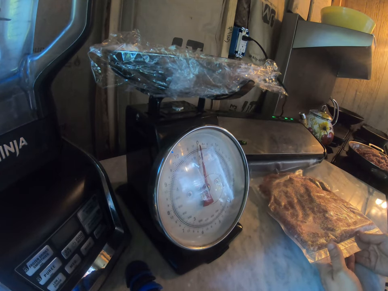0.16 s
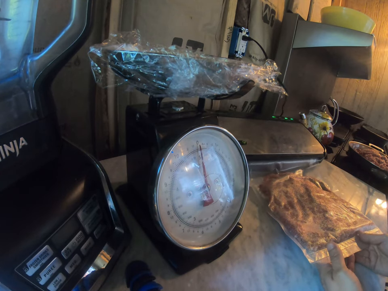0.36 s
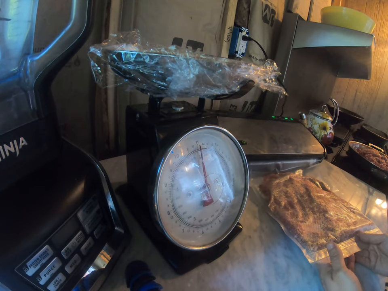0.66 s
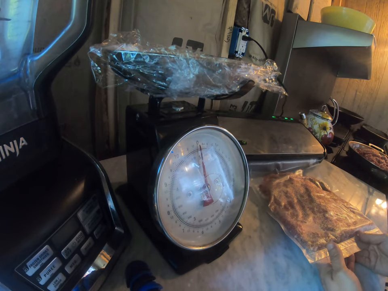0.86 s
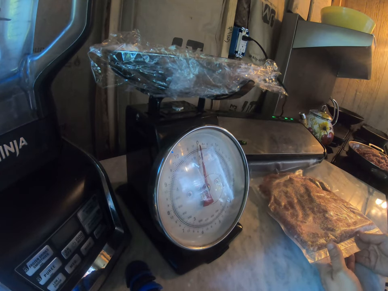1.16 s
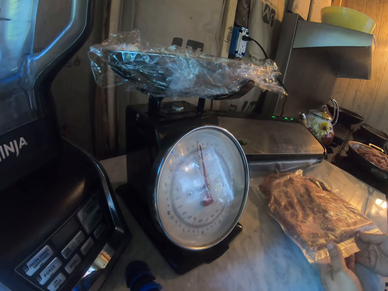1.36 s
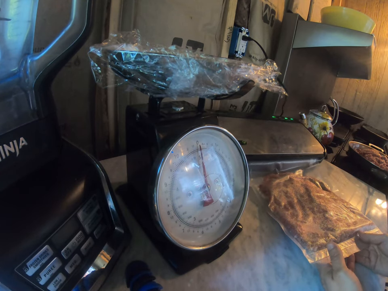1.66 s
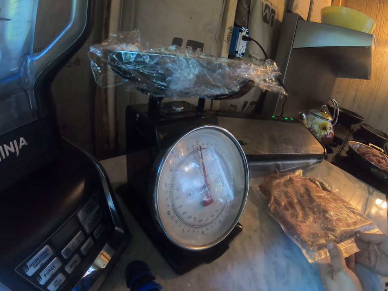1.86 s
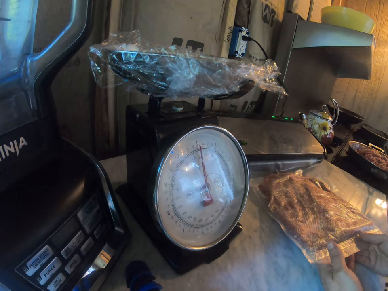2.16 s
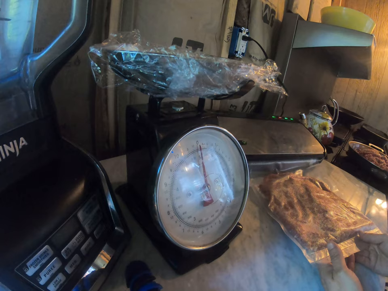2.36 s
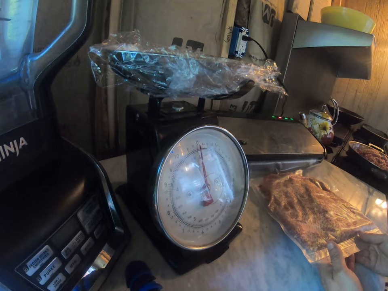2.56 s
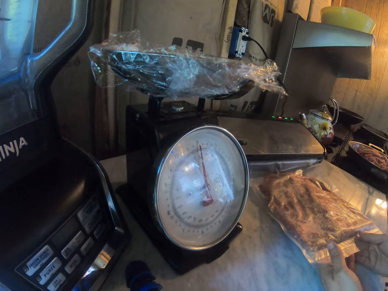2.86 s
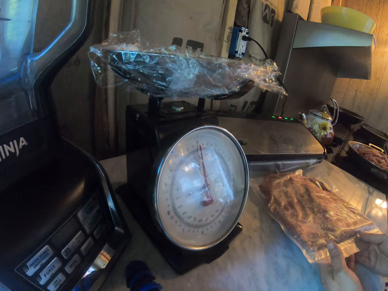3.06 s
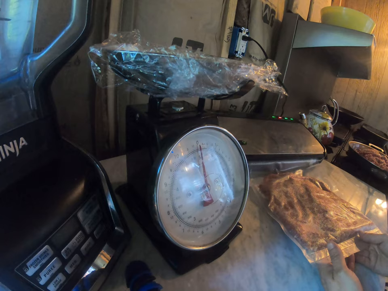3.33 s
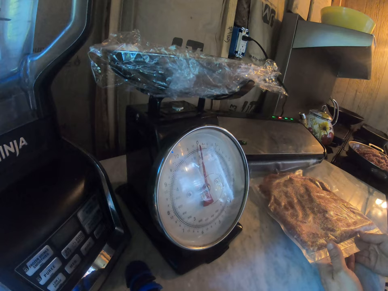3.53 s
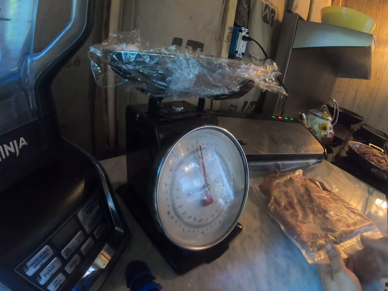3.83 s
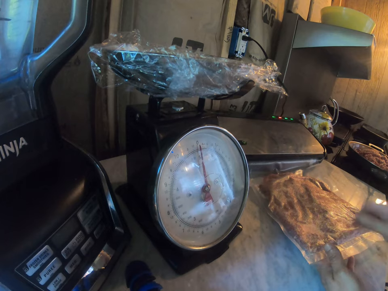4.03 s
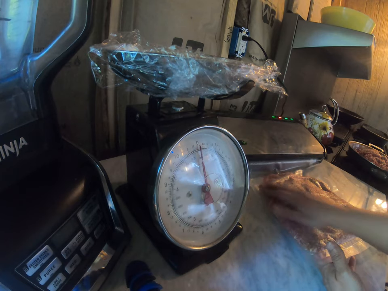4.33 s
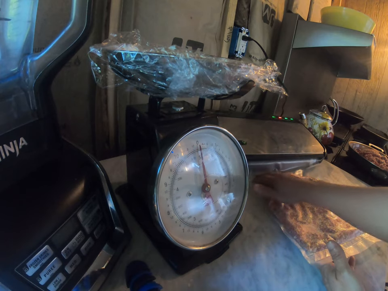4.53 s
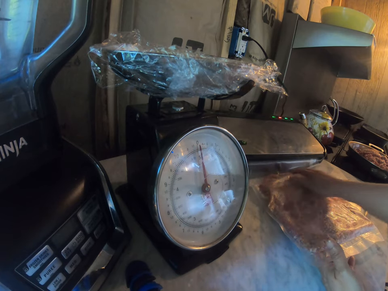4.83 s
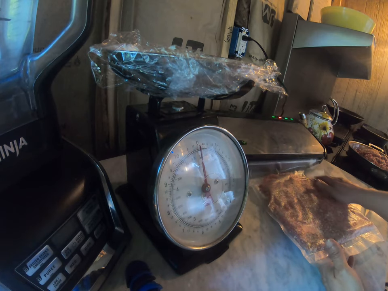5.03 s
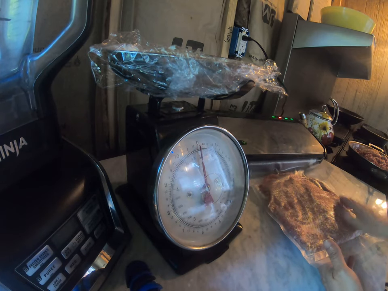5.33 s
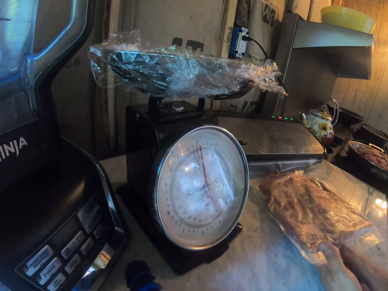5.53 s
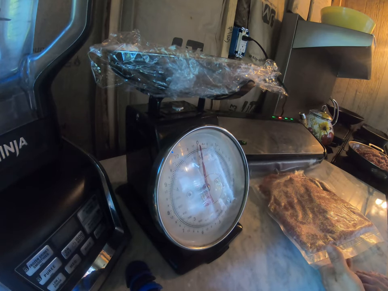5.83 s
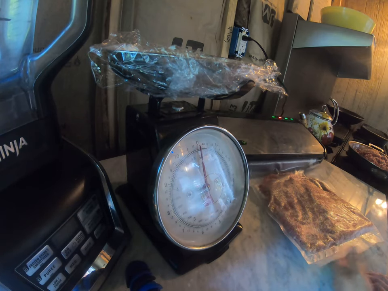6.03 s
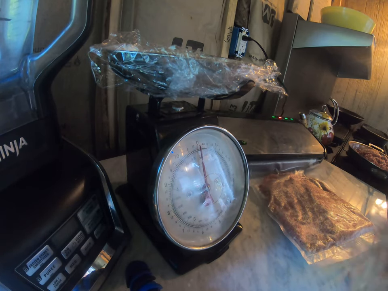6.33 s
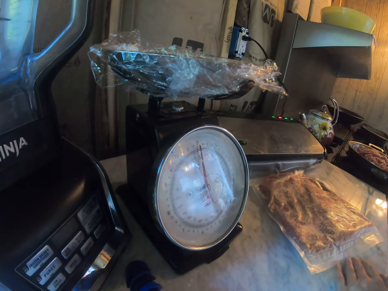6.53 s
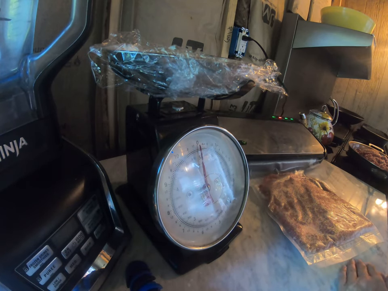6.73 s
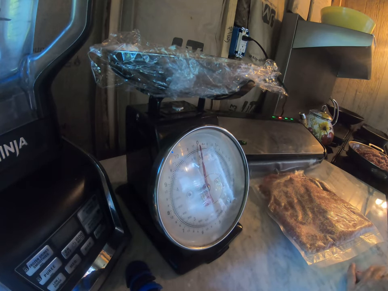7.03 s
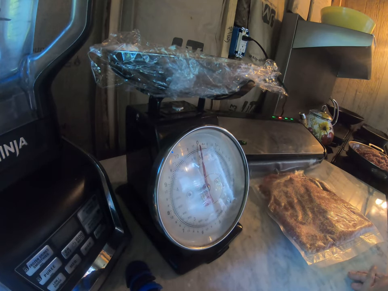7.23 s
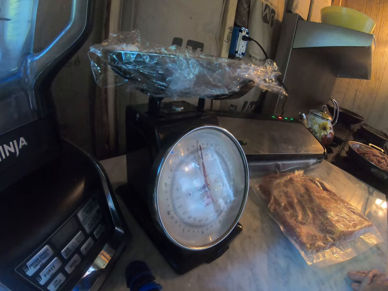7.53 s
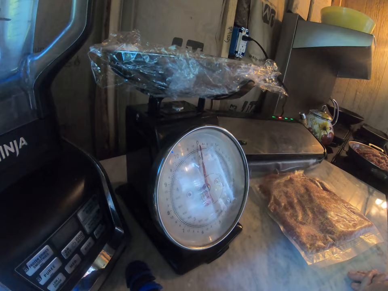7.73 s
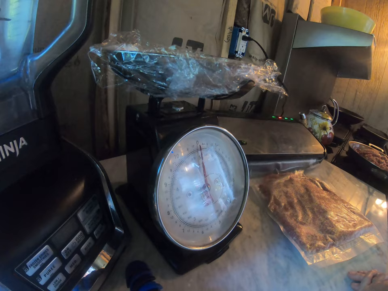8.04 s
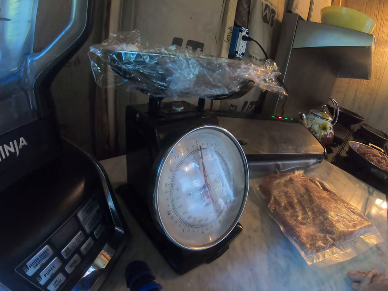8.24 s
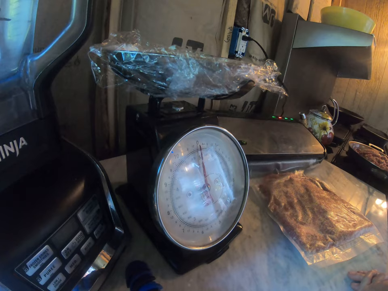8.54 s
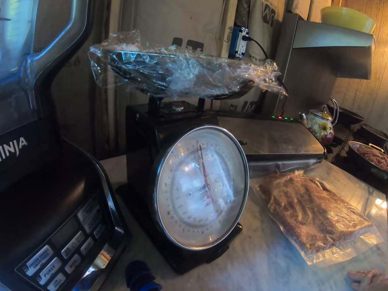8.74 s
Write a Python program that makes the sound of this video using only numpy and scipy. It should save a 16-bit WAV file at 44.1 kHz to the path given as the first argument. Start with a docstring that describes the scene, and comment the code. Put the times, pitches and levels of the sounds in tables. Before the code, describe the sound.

A vacuum sealer pump drones and buzzes, stops with a valve tick, then a plastic bag crinkles and taps the counter over a throbbing low hum.

```python
"""In a small kitchen, a vacuum sealer pumps air from a bag, stops at about 2.4 s, and its valve ticks.
The pump is a droning set of partials with noise for the air, the slapping flaps and a loose part.
A hand then shifts a plastic bag of meat and taps it on the counter: filtered noise, tiny snaps, short ringing tones.
Throughout, a throbbing low hum comes through the walls, probably from engines running outside:
beating tones over filtered rumble and hiss, louder towards the end."""
import sys
import numpy as np
from scipy import signal
from scipy.fft import rfft, irfft, next_fast_len
from scipy.io import wavfile
from scipy.ndimage import uniform_filter1d

SR = 44100
rng = np.random.default_rng(int(sys.argv[2]) if len(sys.argv) > 2 else 0)


def pcm_store(signal):
    """Save signal as 16-bit PCM."""
    levels = np.round(np.clip(np.atleast_2d(signal), -1, 1) * 32767)
    wavfile.write(sys.argv[1], SR, levels.astype(np.int16).T)


N = 392049
T = np.arange(N) / SR  # time in seconds

# A t60 is the time in seconds in which a sound fades by 60 dB.
# Levels in the tables are starting points; the functions trim and vary them.
# The motor runs until STOP_S; the air flow from the bag dwindles with the time constant EMPTYING_S.
STOP_S, EMPTYING_S = 2.422, 1
# After the stop the drone rings out and the air hisses on a moment longer.
DRONE_T60_S, AIR_T60_S, AIR_LINGERS_S = 0.32, 0.17, 0.024
VALVE_S = 2.641  # when the valve ticks
# Average pump speed. Each row: time in seconds, strokes per second.
PUMP_SPEED = [(0, 72.15), (.5, 72.45), (1.33, 72.9), (2.4, 73.5), (2.47, 76)]
# Strong partials of the pump drone. Each row: multiple of the stroke rate, level in dB, left minus right in dB.
DRONE_PARTIALS = [(1, -20, -2.5), (2, -26.5, 1), (3, -38.5, 0), (4, -36, -0.5), (5, -39, 0), (6, -39.5, 0),
                  (7, -35.5, 1.5), (8, -39, 6), (9, -44, 3), (10, -37.5, 0), (11, -40, 3), (12, -52, 6),
                  (13, -58, -2), (14, -52.5, -20), (15, -47, -8), (16, -48, -3), (17, -47.5, -12),
                  (18, -38.5, -4.5), (19, -46, 8), (20, -46.5, -6), (22, -49.5, -4.5), (23, -50, -3),
                  (24, -54, 16), (25, -53.0, 4), (26, -52, -16), (27, -57, 1), (31, -54, -3), (34, -54, -3),
                  (35, -58, -4), (37, -55, 0), (38, -57, -3), (41, -58, -2)]
# Faint valve buzz above the drone. Each row: frequency in Hz, level in dB.
VALVE_BUZZ = [(1500, -63), (2000, -54.5), (2150, -65), (2350, -56), (2550, -68), (2900, -59.5),
              (3150, -61.5), (3500, -65), (4400, -70)]
# How far the casing scatters the partials out of step. Each row: frequency in Hz, typical phase in radians.
PHASE_SMEAR = [(400, 2), (900, .6), (1600, .65), (3000, 1.1)]
# How far the left ear leads the right. Each row: frequency in Hz, lead in radians.
LEFT_EAR_LEAD = [(300, -0.57), (600, -0.39), (950, -1.9), (1290, 0.91), (1640, 1.7), (1980, -1.5),
                 (2330, 0), (2840, 0.14)]
# Outlet resonances and a dip, strongest while air flows. Each row: frequency in Hz, width in Hz, dB at full flow.
OUTLET_BUMPS = [(413, 82, 8.5), (864, 65, 17), (1222, 70, 20), (1554, 51, 17.5), (1940, 98, 11),
                (2500, 86, -12), (2930, 210, 10.5)]
# Casing resonances and notches, which deepen as the diaphragm strains against the vacuum.
# Each row: frequency in Hz, width in Hz, dB at full vacuum.
CASING_BUMPS = [(700, 47, 4.5), (795, 46, -9), (980, 43, 12), (1179, 43, 14), (1305, 31, -16),
                (2690, 70, 6)]
# Pump chamber resonances, which sink as the pressure falls.
# Each row: frequency in Hz at the start, frequency in Hz at the stop, width in Hz, lift in dB.
CHAMBER_BUMPS = [(1058, 930, 93, 9), (2446, 2330, 45, 12.5)]
# Air forced through the valves. Each row: frequency in Hz, level in dB per Hz.
AIR_SPECTRUM = [(100, -69), (250, -81), (500, -67.5), (950, -76), (1250, -68), (1550, -74.5), (1850, -75),
                (2400, -78.5), (2950, -76.5), (3400, -79.5), (4400, -87), (5000, -89), (7400, -87.5),
                (8200, -94), (10000, -100), (14000, -119)]
# Resonance of the valve flaps. Each row: frequency in Hz, level in dB per Hz.
FLAP_SPECTRUM = [(300, -82), (900, -67), (1250, -55.5), (1600, -72), (3000, -76.5), (5000, -91),
                 (12000, -130)]
# The last strokes clack as the motor stalls. Each row: time in seconds, level in dB.
LAST_CLACKS = [(2.412, 2), (2.425, 3), (2.45, 5), (2.479, -2), (2.52, -20)]
# A loose part of the casing chatters. Each row: frequency in Hz, level in dB per Hz.
CHATTER_SPECTRUM = [(1200, -120), (1700, -81.5), (1770, -66), (1860, -71), (1950, -80), (2800, -120)]
# The chatter sets in around CHATTER_S and flutters. Each row: flutters per second, depth in dB.
CHATTER_S = 0.7
FLUTTERS = [(6.5, 2.6), (20.3, 3.5)]
# The valve's tick. Each row: frequency in Hz, level in dB per Hz.
TICK_SPECTRUM = [(600, -96), (1400, -62), (2200, -69), (3300, -67.5), (5500, -82), (8000, -71),
                 (10000, -87), (14000, -102)]
# Moves of the hand on the bag; each fades out by one and a half lengths.
# Each row: start in seconds, length in seconds, level in dB, crackle over rubbing in dB.
HAND_MOVES = [(3.754, .12, -2.5, -3), (3.867, 0.018, 0.5, 0.5), (4.064, 0.24, -6, -1),
              (4.678, 0.17, -0.5, 1.5), (4.808, .17, 2, -10), (5.048, 0.055, -1.5, 1.5),
              (5.2, 0.097, -1, -7), (5.42, 0.047, -4.5, 7), (5.465, 0.14, -3, 1), (6.026, 0.075, -1, -3),
              (6.11, .045, -2, -6), (6.415, 0.021, -10, 10.5), (6.473, 0.15, -2.5, -7)]
# Crackle of the plastic film. Each row: frequency in Hz, level in dB per Hz.
FILM_SPECTRUM = [(500, -110), (1300, -85), (3100, -90.5), (4300, -94.5), (6000, -91.5), (8500, -95),
                 (11000, -107), (15000, -128)]
# The film rubbing on the counter. Each row: frequency in Hz, level in dB per Hz.
RUB_SPECTRUM = [(600, -110), (1300, -77), (2200, -84), (3100, -83.5), (3800, -91), (7000, -110),
                (14000, -140)]
# Sliding film. Each row: start in seconds, length in seconds, peak level in dB per Hz, peak frequency in Hz.
FILM_SLIDES = [(4.834, 0.068, -70.5, 2750), (5.06, .045, -79, 2800), (5.22, .09, -82, 2700),
               (5.419, .15, -79, 3150), (6.475, .025, -75, 3250), (6.562, 0.037, -75, 3300)]
# Taps of the bag on the counter. Each row: start in seconds, level in dB, brightness in dB, pitch ratio.
BAG_TAPS = [(3.878, -34, 9, 0.98), (4.788, -27.5, 5, 1.25), (4.864, -21.5, -8, 0.9),
            (4.8894, -18.5, 2, 1.14), (4.9285, -7.8, 2.2, 1.035), (4.9402, -28, 18, 1.1),
            (5.611, -22.5, -9, 0.92), (6.139, -12, -21, 0.91), (6.483, -24.5, 0, 1.2),
            (6.489, -24, -6, 0.99), (6.571, -26, -1, 0.7), (6.588, -21.5, 2.5, 1.05), (6.6, -27, -5, 0.91),
            (6.657, -21.5, -3, 0.8)]
# What the taps ring with. Each row: frequency in Hz, t60 in seconds, level in dB.
TAP_RINGS = [(1420, 0.013, -1.5), (1700, 0.0075, 5), (2370, 0.0069, 0), (2750, 0.008, -6.5),
             (3700, .006, -16), (5440, 0.011, -15.5), (7160, 0.007, -14.5), (8700, 0.0057, -20)]
# Each tap jolts the film: crackle in dB for a tap of 0 dB, dB per dB of tap, t60 in seconds.
JOLT_DB, JOLT_SLOPE, JOLT_T60_S = 14, 0.95, 0.13
# Average speed of the first engine. Each row: time in seconds, cycles per second.
ENGINE_SPEED = [(0, 25.17), (2.5, 25.07), (3.3, 25.65), (4.1, 25.73), (4.7, 25.18), (5.3, 25.6),
                (7.2, 24.96), (8, 25.4), (8.9, 24.95)]
# Its partials. Each row: multiple of the cycle rate, level in dB.
ENGINE_PARTIALS = [(1, -44), (2, -32.5), (3, -29.5), (4, -40.5), (6, -33.5), (7, -34), (8, -34.5),
                   (10, -44), (12, -44.5), (13, -45), (26, -63.5)]
# Its booming partial. Each row: time in seconds, level in dB, depth of the throb from 0 to 1.
BOOM_LEVEL = [(0.74, -26, 0.08), (0.97, -20, 0.5), (1.94, -27, 0.93), (1.96, -20, 0.76), (2.68, -26, 0.15),
              (3.23, -25.5, 0.34), (3.8, -25.5, 0.15), (4.25, -19.0, 0.18), (4.61, -20, 0.77),
              (5.12, -24.5, 0.6), (5.51, -22, 0.33), (5.88, -28.5, 0.5), (6.21, -23.5, 0.9),
              (6.83, -21, 0.5), (7.22, -22.5, 0), (7.65, -21, 0.38), (8.04, -16.5, 0.65), (8.78, -18, 0.34)]
# The boom throbs evenly between these crests, about three times a second.
# Each row: time in seconds, throbs so far.
BOOM_THROBS = [(-.21, 0), (1.47, 5), (2.05, 7), (2.41, 8), (2.97, 10), (3.44, 11), (4.23, 14), (5.1, 17),
               (5.53, 18), (7.47, 24), (8.66, 28), (8.83, 29), (9.1, 30)]
# The engine's two lowest partials swell and ebb: crest in seconds, width in seconds, lift in dB.
LOW_SWELL = (7.4, 2, 9.8)
# A second, wavering hum that draws near.
# Each row: time in seconds, base pitch in Hz, level in dB, depth of the pulsing from 0 to 1.
SECOND_HUM = [(0, 61.2, -44.5, 0.1), (3, 61.83, -43.5, 0.03), (5.2, 62.03, -40, 0),
              (6.1, 61.77, -30.5, .05), (6.9, 60.4, -28, 0.75), (7.5, 60.64, -30, 0.44),
              (8, 61.72, -26.5, 0.68), (8.4, 61.33, -28, 0.57), (8.9, 61.07, -24.5, 0.46)]
# Its partials. Each row: multiple of the base pitch, level in dB.
SECOND_HUM_PARTIALS = [(4, -1), (5, -17.5), (6, -16), (8, -23), (10, -29), (11, -34.5)]
# The second hum pulses about six times a second. Each row: time in seconds, pulses so far.
SECOND_HUM_PULSES = [(0, 0), (6.9, 40), (7.37, 43), (7.65, 44), (7.89, 45), (8.04, 46), (8.42, 48),
                     (8.95, 51)]
# Its fifth and sixth partials each flare up once: crest in seconds, width in seconds, lift in dB.
FIFTH_FLARE, SIXTH_FLARE = (7.9, 0.38, 11), (6.32, 0.4, 8)
# Rumble of the running machinery. Each row: frequency in Hz, level in dB per Hz.
RUMBLE_SPECTRUM = [(20, -75.5), (34, -54.5), (44, -59.5), (65, -52.5), (90, -53), (122, -43), (150, -51.5),
                   (200, -55.5), (270, -57.5), (350, -57), (420, -70), (540, -73), (650, -73), (780, -89.5),
                   (1500, -110), (6000, -170)]
# Hiss of the running machinery. Each row: frequency in Hz, level in dB per Hz.
HISS_SPECTRUM = [(300, -74), (800, -78), (1050, -74), (1550, -82), (1950, -82), (3200, -91), (4600, -97),
                 (8000, -103), (10000, -112), (14000, -132)]
# The machinery grows louder at an even rate from SWELL_S on: dB before, then dB per second.
SWELL_S = 2.17
HUM_SWELL, RUMBLE_SWELL, HISS_SWELL = (-4.5, 0.37), (-2.68, 0.46), (-2, 0.73)


def pump(ripple=0.11, jitter=0.00065, uneven_db=0.17, air_db=-4.5, puff_db=6, thinning_db=-1,
         flap_db=-17.0, slap_db=8, slap_sharpness=8, clack_t60=0.073):
    """Diaphragm strokes drone, puff air and slap the flaps, harder under vacuum; a few slow clacks end the run."""
    strokes_per_s, = curves(PUMP_SPEED)
    running = until(STOP_S, DRONE_T60_S)
    stroke = angle(strokes_per_s * (1 + jitter * walk(38.5)))
    # no two strokes are equally hard
    stroke_number = np.round(stroke / (2 * np.pi)).astype(int)
    force = undb(uneven_db * rng.standard_normal(1024))[stroke_number % 1024]
    # the rectified supply shakes the motor's torque 120 times a second
    shake = 1 + ripple * np.cos(2 * np.pi * 120 * T)
    tone = drone(stroke, uniform_filter1d(force, size=128)) * shake * running
    # the outlet flap stands open for half of each stroke
    opening = np.sqrt(np.maximum(np.cos(stroke), 0))
    puffs = undb(puff_db * opening) * force ** opening
    air = colour(noise(alike=0.67) * puffs, AIR_SPECTRUM)
    # it echoes briefly inside the casing
    air = kitchen(air, t60=0.048, wet_db=0)
    air *= undb(air_db + thinning_db * vacuum()) * until(STOP_S + AIR_LINGERS_S, AIR_T60_S)
    slaps = opening ** slap_sharpness * force * undb(flap_db + slap_db * vacuum()) * running
    clacks = sum(undb(db) * burst(s, clack_t60) for s, db in LAST_CLACKS)
    flaps = colour(noise(alike=0.69) * (slaps + clacks), FLAP_SPECTRUM)
    rattle = (flaps + chatter(opening * running)) * pan(-2.1)
    return tone + kitchen(air * pan(-1.2) + rattle, t60=0.27, wet_db=-10.5)


def drone(stroke, force, knock_hz=900, knock_db=1.5, knock_t60=0.09, upper_db=-2,
          buzz_db=1.0, buzz_spread_db=4.0, count=5):
    """Partials of the strokes, coloured by outlet, casing and chamber; the upper ones swell into knocks."""
    on = T < STOP_S + 2 * DRONE_T60_S
    flow, strain = np.exp(-T[on] / EMPTYING_S), vacuum()[on]
    progress = np.minimum(T[on] / STOP_S, 1)
    chamber = [(first + (last - first) * progress, width, db) for first, last, width, db in CHAMBER_BUMPS]
    strong = {round(k): (db, pan_db) for k, db, pan_db in DRONE_PARTIALS}
    tone = np.zeros((2, N))
    # the upper partials swell with each stroke and die quickly once the motor stops
    knock = force * undb(upper_db + knock_db * np.cos(stroke)) * until(STOP_S, knock_t60)
    for k in range(1, 60):
        hz = k * PUMP_SPEED[1][1]
        # the faint upper partials come and go as the pressure changes
        drift = np.interp(T[on], np.linspace(0, STOP_S, count), rng.standard_normal(count))
        faint = (db_at(hz, VALVE_BUZZ) + buzz_db + buzz_spread_db * drift, -3)
        db, pan_db = strong.get(k, faint)
        db = db + flow * lift_db(hz, OUTLET_BUMPS) + strain * lift_db(hz, CASING_BUMPS)
        db = db + lift_db(hz, chamber)
        # less scatter keeps partials in step, so that they make one knock per stroke
        phase = db_at(hz, PHASE_SMEAR) * rng.standard_normal()
        lead = db_at(hz, LEFT_EAR_LEAD) * np.array([[1], [-1]]) / 2
        ears = pan(pan_db) / np.sqrt(np.mean(pan(pan_db) ** 2))
        strength = undb(db) * (knock[on] if hz > knock_hz else 1)
        tone[:, on] += ears * strength * np.sqrt(2) * np.cos(k * stroke[on] + phase + lead)
    return -tone


def chatter(push, chatter_db=-1, onset_s=0.27):
    """A loose part of the casing buzzes at each push of the diaphragm, in a quick flutter."""
    flutter_db = sum(db * np.cos(2 * np.pi * hz * T) for hz, db in FLUTTERS)
    loose = (1 + np.tanh((T - CHATTER_S) / onset_s)) / 2
    return colour(noise(alike=0.99) * push * loose * undb(chatter_db + flutter_db), CHATTER_SPECTRUM)


def valve(t60=0.032, ring_hz=8200, ring_db=-83, ring_t60=0.24):
    """A dry tick of noise with a thin ring of the valve's spring."""
    tick = colour(noise(alike=0.48) * burst(VALVE_S, t60), TICK_SPECTRUM)
    spring = [(ring_hz / 2, -130), (ring_hz * 0.53, ring_db - 12), (ring_hz, ring_db), (ring_hz * 2.5, -130)]
    ring = colour(noise(alike=0.1) * burst(VALVE_S, ring_t60), spring)
    return kitchen(tick + ring, t60=0.25, wet_db=-7.5) * pan(-2.4)


def taps(tap_db=-4, bright_hz=2200, rise_s=0.00025, low_cut_hz=800):
    """Short knocks ring in several tones; a brighter one starts faster and favours the high tones."""
    out, t = np.zeros(N), T[:2048]
    for s, db, bright_db, pitch in BAG_TAPS:
        ring = 0
        for hz, t60, mode_db in TAP_RINGS:
            detune = pitch * (1 + 0.029 * rng.standard_normal())
            tilt_db = bright_db * np.log2(hz / bright_hz) / 2
            ring = ring + undb(mode_db + tilt_db - 60 * t / t60) * np.sin(2 * np.pi * hz * detune * t)
        contact = 1 - np.exp(-(t / (rise_s * undb(-bright_db))) ** 2)
        start = int(s * SR)
        out[start:start + len(t)] -= undb(db + tap_db) * ring * contact
    # a small thing radiates little bass
    out = signal.sosfilt(signal.butter(2, low_cut_hz, "high", fs=SR, output="sos"), out)
    return kitchen(from_right(out, pan_db=-9), t60=0.065, wet_db=-11.5)


def film_cracks(crack_db=21, bright_share=0.5, t60=0.017):
    """At the instant of each tap the taut film gives a sharp crack, louder for a harder tap."""
    cracks = sum(undb(crack_db + db + bright_share * bright_db) * burst(s, t60)
                 for s, db, bright_db, _ in BAG_TAPS)
    return colour(noise(alike=0.3) * cracks, FILM_SPECTRUM)


def bag(snaps_per_s=1100, scatter_db=2.5, rub_grain_db=3):
    """Each move of the hand drags the film and lets it buckle in many tiny snaps; taps jolt it too."""
    crackle = sum(undb(JOLT_DB + JOLT_SLOPE * (db + bright_db)) * burst(s, JOLT_T60_S)
                  for s, db, bright_db, _ in BAG_TAPS)
    drag = 0
    for s, length, db, crackle_db in HAND_MOVES:
        corners = [s, s + length / 4, s + length, s + 1.5 * length]
        move = undb(db) * np.interp(T, corners, [0.016, 0.79, 0.38, 0.0076], left=0, right=0)
        crackle = crackle + undb(crackle_db) * move
        drag = drag + move
    snap_now = rng.random(N) < snaps_per_s / SR
    snap_size = undb(scatter_db * np.minimum(rng.exponential(size=N), 4))
    snaps = snap_now * noise(alike=0.2) * snap_size
    film = colour(snaps / snaps.std() * crackle, FILM_SPECTRUM)
    rub = colour(noise(alike=0.81) * drag * undb(rub_grain_db * walk(150)), RUB_SPECTRUM)
    return kitchen((film + rub) * pan(-1.5), t60=0.25, wet_db=-1.5)


def swishes(width=0.11, skirt_db=-16, grain_db=4):
    """Sliding film sings in a narrow, grainy band that swells and fades with the stroke of the hand."""
    out = 0
    for s, length, db, hz in FILM_SLIDES:
        slide = np.sin(np.pi * np.clip((T - s) / length, 0, 1)) * undb(grain_db * walk(120))
        band = [(hz / 2, db - 51), (hz / (1 + width) ** 2, db + skirt_db), (hz, db),
                (hz * (1 + width) ** 2, db + skirt_db), (hz * 2, db - 51)]
        out = out + colour(noise(alike=0.51) * slide, band)
    return kitchen(out * pan(-1.5), t60=0.25, wet_db=-8)


def engines(order=5, upper_db=-17, upper_share=0.39):
    """Engine hum through the walls; its fifth partial booms, over rumble, hiss and a second, pulsing hum."""
    hz, = curves(ENGINE_SPEED)
    beat = 2 * np.pi * curves(BOOM_THROBS)[0]
    rows = partials(hz * (1 + 0.0021 * walk(5)), ENGINE_PARTIALS, flicker_db=2.0, flicker_rate=7)
    low = rows[:2].sum(axis=0) * undb(lift_db(T, [LOW_SWELL]))
    hum = (low + rows[2:].sum(axis=0)) * swell(*HUM_SWELL)
    second_hz, second_db, pulse_depth = curves(SECOND_HUM)
    unsteady_hz = second_hz * (1 + 0.005036 * walk(9))
    fourth, fifth, sixth, *higher = partials(unsteady_hz, SECOND_HUM_PARTIALS, flicker_db=1.8, flicker_rate=6)
    pulsing = 1 + pulse_depth * np.cos(2 * np.pi * curves(SECOND_HUM_PULSES)[0])
    second = (fourth * pulsing + fifth * undb(lift_db(T, [FIFTH_FLARE]))) * undb(second_db)
    # the upper partials follow only a share of the rise in level
    upper = sixth * undb(lift_db(T, [SIXTH_FLARE])) + sum(higher)
    second += upper * undb(upper_db + upper_share * second_db)
    rumble = colour(noise(alike=0.92), RUMBLE_SPECTRUM) * swell(*RUMBLE_SWELL) * undb(1.2 * walk(10))
    hiss = colour(noise(alike=0.3), HISS_SPECTRUM) * swell(*HISS_SWELL) * undb(0.95 * walk(12)) * pan(-1.3)
    return (hum + second + boom(order * hz, beat, second_db) + rumble) * pan(0.55) + hiss


def boom(hz, beat, second_db, flutter_db=1):
    """A tone beats with a neighbour just below; the second hum, twice as far below, adds a doubly fast flutter."""
    level_db, depth = curves(BOOM_LEVEL)
    carrier = angle(hz)
    throb = undb(level_db) * (np.cos(carrier) + depth * np.cos(carrier - beat))
    flutter = undb(second_db + flutter_db) * np.cos(carrier - 2 * beat)
    return np.sqrt(2) * (throb + flutter)


def partials(hz, orders, flicker_db, flicker_rate):
    """Multiples of a base pitch, one row each, wavering in strength."""
    turn = angle(hz)
    rows = []
    for k, db in orders:
        strength = undb(db + flicker_db * walk(flicker_rate))
        rows.append(strength * np.sqrt(2) * np.cos(round(k) * turn + rng.uniform(0, 2 * np.pi)))
    return np.array(rows)


def kitchen(x, t60, wet_db):
    """Direct sound plus a short wash from walls and cupboards, different at each ear."""
    t = T[:SR // 2]
    wash = rng.standard_normal((2, len(t))) * undb(-60 * t / t60) * (t > 0.003)
    wash *= undb(wet_db) / np.sqrt(np.sum(wash ** 2) / 2)
    return x + signal.fftconvolve(np.atleast_2d(x), wash, axes=1)[:, :N]


def pan(db):
    """Gains of the two ears for a left-minus-right level."""
    return undb(np.array([[db], [-db]]) / 2)


def from_right(x, pan_db, delay=2):
    """A sound on the right reaches the left ear weaker and a few samples late."""
    return np.array([np.roll(x, delay), x]) * pan(pan_db)


def vacuum():
    """How far the bag has been emptied, 0-1; the last of the vacuum builds fastest."""
    return np.minimum(T / STOP_S, 1) ** 2.46


def burst(s, t60):
    """An envelope that jumps up at time s and dies away."""
    age = np.maximum(T - s, 0)
    return (age > 0) * undb(-60 * age / t60)


def until(s, t60):
    """An envelope that holds up to time s and then dies away."""
    return undb(-60 * np.maximum(T - s, 0) / t60)


def swell(db, db_per_s):
    """Gain of a sound that grows evenly once the machinery starts to swell."""
    return undb(db + db_per_s * np.maximum(T - SWELL_S, 0))


def lift_db(at, bumps):
    """The sum of bell-shaped bumps, each given as (centre, width, dB)."""
    return sum(db * np.exp(-((at - centre) / width) ** 2) for centre, width, db in bumps)


def undb(db):
    """Decibels to gain."""
    return 10 ** (np.asarray(db) / 20)


def curves(table):
    """The columns of a table, joined by straight lines in time."""
    s, *columns = np.transpose(table)
    return [np.interp(T, s, c) for c in columns]


def db_at(hz, points):
    """The value of a table at a frequency, read on a log-frequency axis."""
    f, db = np.transpose(points)
    return np.interp(np.log(hz + 1e-3), np.log(f), db)


def colour(x, points):
    """Filter that gives white noise this spectrum, without any sound ahead of its cause."""
    size = next_fast_len(N + 8192)
    size += size % 2
    gain = undb(db_at(np.fft.rfftfreq(size, 1 / SR), points)) * np.sqrt(SR / 2)
    # folding the log spectrum's echo-like form to one side makes the filter causal
    cepstrum = irfft(np.log(gain))
    cepstrum[1:size // 2] *= 2
    cepstrum[size // 2 + 1:] = 0
    return irfft(rfft(x, size) * np.exp(rfft(cepstrum)))[..., :N]


def noise(alike):
    """White noise at two ears that share a part of it."""
    alike = np.clip(alike, 0, 1)
    return np.sqrt(alike) * rng.standard_normal(N) + np.sqrt(1 - alike) * rng.standard_normal((2, N))


def walk(rate):
    """Smooth chance: random steps, this many a second, averaged twice."""
    k = int(SR / rate)
    steps = rng.standard_normal(4096)[np.arange(N) // k % 4096]
    return 1.3 * uniform_filter1d(uniform_filter1d(steps, k), k)


def angle(hz):
    """Running phase of a changing frequency."""
    return 2 * np.pi * np.cumsum(hz) / SR


def scene():
    """Everything in the kitchen."""
    return pump() + valve() + taps() + film_cracks() + bag() + swishes() + engines()


def record(dry, top_hz=15500):
    """Ease in and out over three milliseconds and cut the highest treble steeply."""
    ease = np.sin(np.pi / 2 * np.clip(np.minimum(T, T[-1] - T) / 0.003, 0, 1)) ** 2
    return signal.sosfilt(signal.ellip(8, 0.2, 70, top_hz, fs=SR, output="sos"), dry * ease)


dry = scene()
out = record(dry)
pcm_store(out)
```